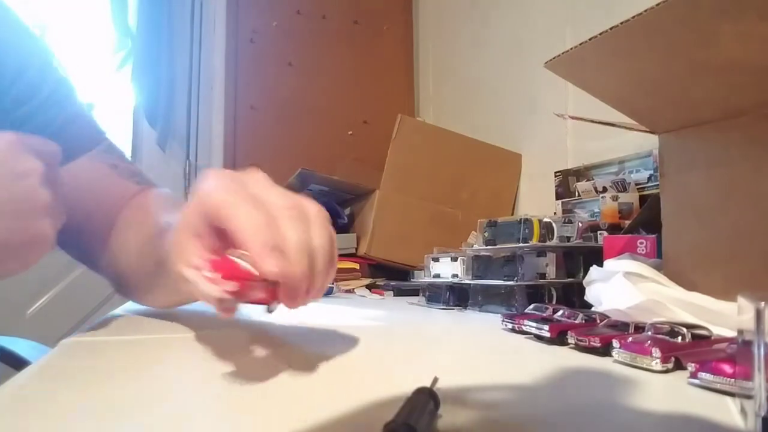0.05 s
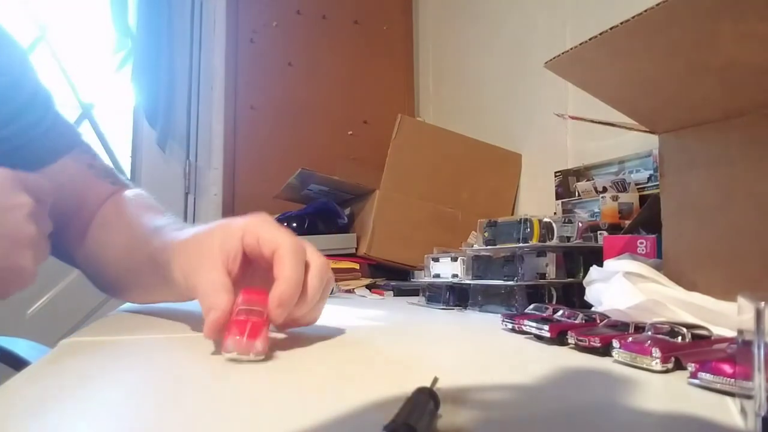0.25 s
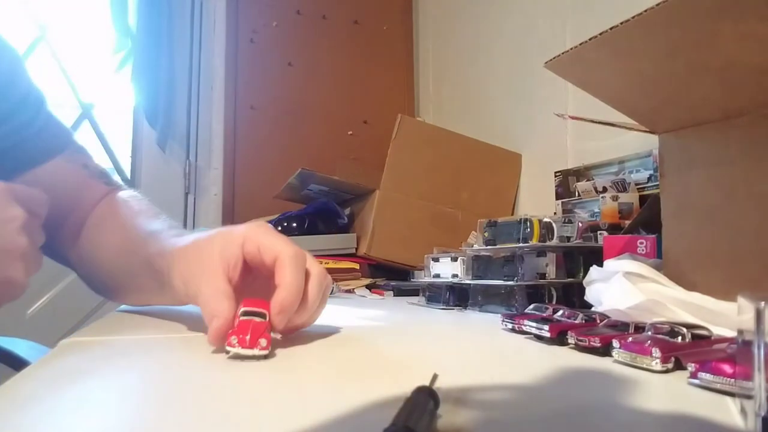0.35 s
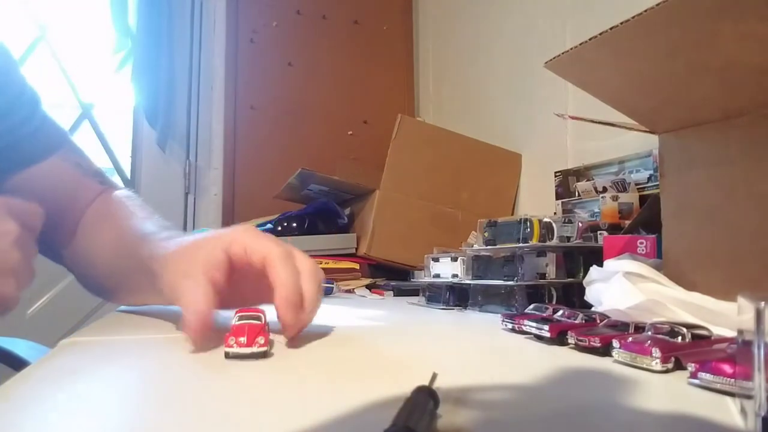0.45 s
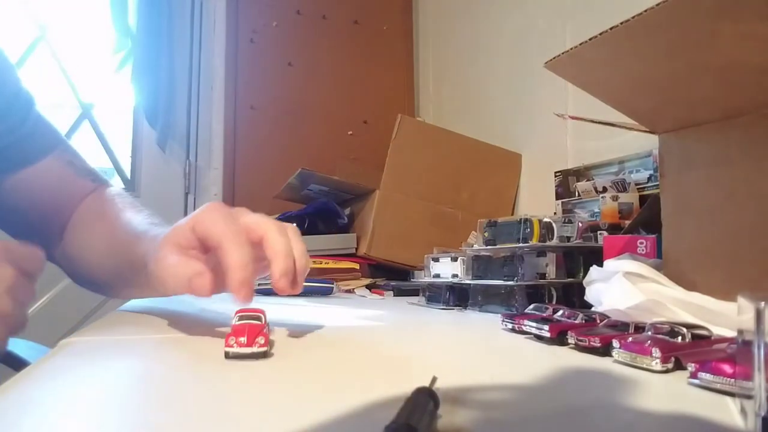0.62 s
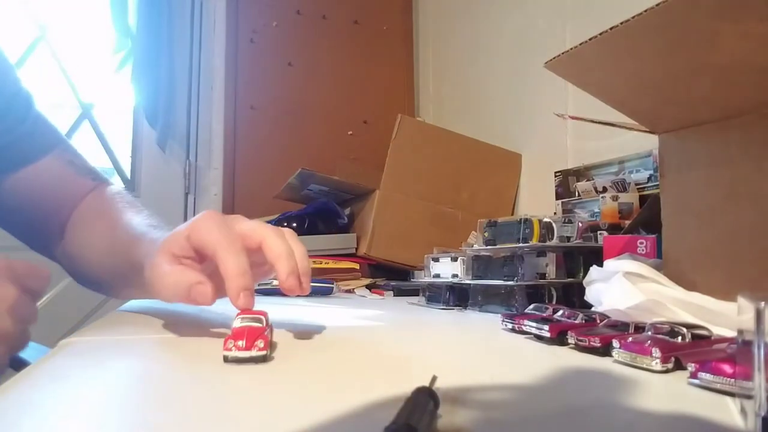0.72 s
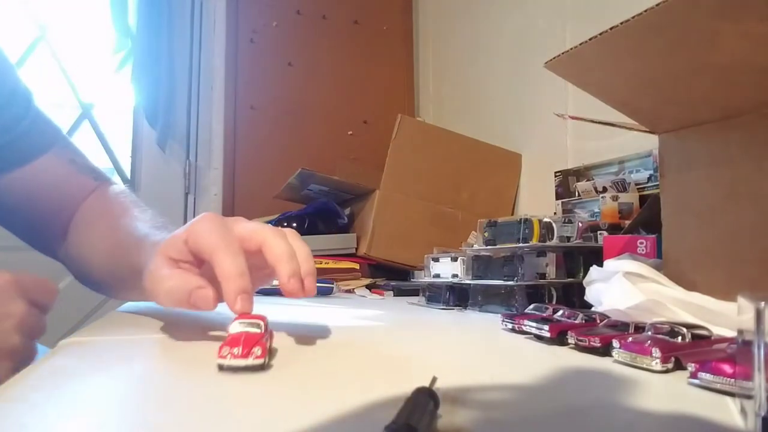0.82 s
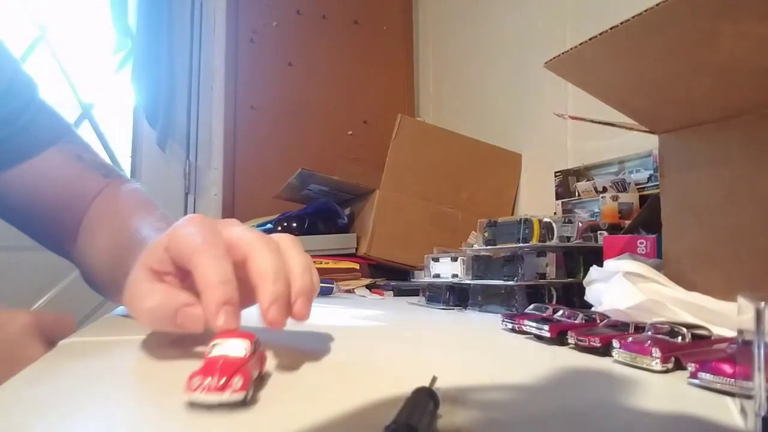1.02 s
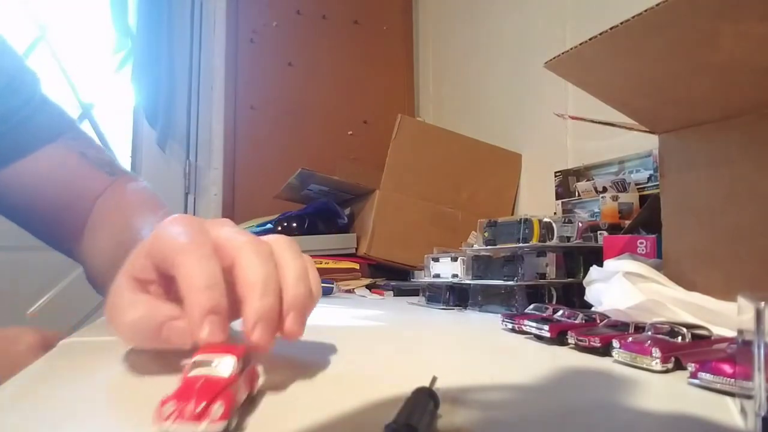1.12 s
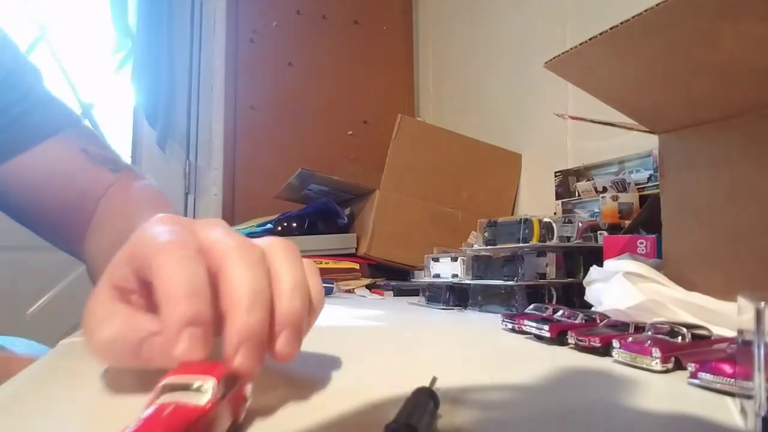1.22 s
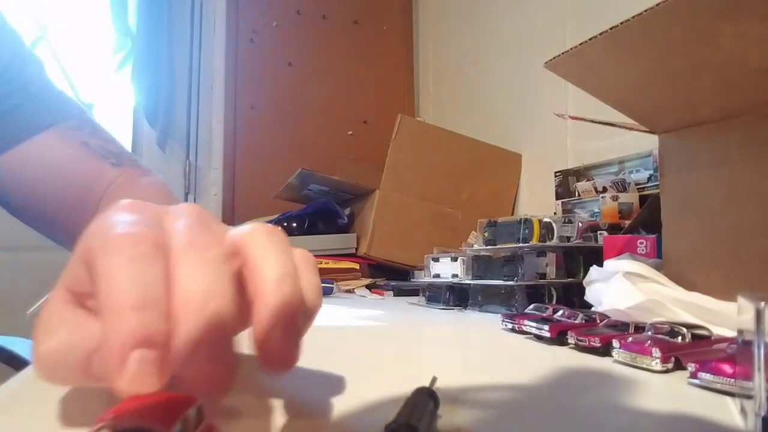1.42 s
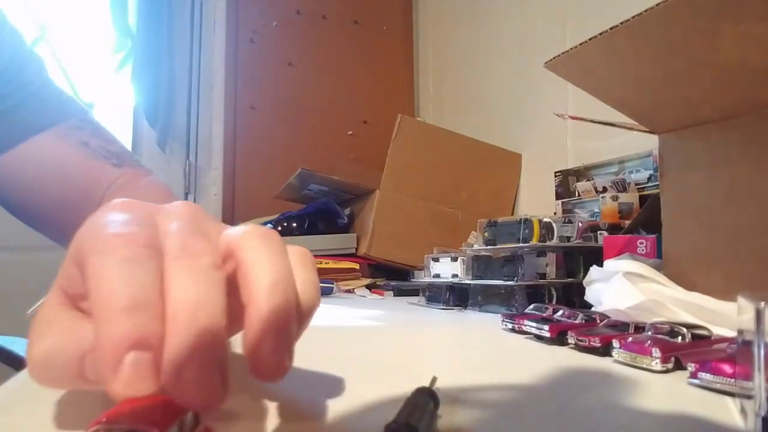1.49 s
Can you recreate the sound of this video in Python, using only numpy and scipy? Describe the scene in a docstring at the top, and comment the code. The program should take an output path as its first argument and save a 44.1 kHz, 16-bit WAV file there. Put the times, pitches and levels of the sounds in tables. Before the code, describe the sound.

Close stereo microphone in a small room: two bright metal-on-table knocks as a toy car is set down, a faint dull touch, then wheels drumming, whirring and rattling along the tabletop before fading.

```python
"""A small metal toy car is set down on a hollow table and bounces, close to a two-port microphone.
A finger touches its roof, then it is pushed along. Contact noise rings through the cast body, thumps
and random wheel bumps drive the modes of the table top, and loose axles tick against the shell.
A small room answers with scatter and a dying tail, over still air and microphone hiss."""
import sys
import numpy as np
from scipy import signal
from scipy.fft import rfft, irfft, next_fast_len
from scipy.io import wavfile

SR = 44100
rng = np.random.default_rng(int(sys.argv[2]) if len(sys.argv) > 2 else 0)


def generate_wav(sig):
    """Save sig (samples, or channels by samples) to the path in sys.argv[1] as 16-bit PCM at SR."""
    pcm = np.round(np.clip(np.atleast_2d(sig).T, -1, 1) * 32767).astype(np.int16)
    wavfile.write(sys.argv[1], SR, pcm)


def magnitude_from_level(level_db):
    """Linear magnitude for a level in decibels (20 dB per decade)."""
    exponent = np.asarray(level_db, float) / 20
    return 10 ** exponent


N = 68355  # samples, about 1.55 s

# Wheels landing. Each row: start in seconds, click level in dB, body knock level in dB,
# ring of the struck corner in Hz.
LANDING_ROWS = [(0.2072, -15.5, -14.5, 2150), (.214, -43, -31, 2150), (0.221, -32, -23, 2150),
                (0.2965, -31, -31, 1520), (0.3359, -17, -10, 760), (0.341, -14.5, -21.5, 1300),
                (0.352, -45, -19, 805), (.366, -27, -27.5, 2000), (0.3718, -16.5, -11, 2800),
                (0.378, -27.5, -21, 1200), (0.386, -31, -35, 2000), (0.3914, -39, -24, 3100),
                (.396, -35.5, -32.5, 2500), (0.4355, -37, -48, 2100)]
# The weight coming down on the table. Each row: start in seconds, thump level in dB.
THUMP_ROWS = [(0.2078, -22), (0.2139, -14), (0.223, -30), (.298, -36.5), (.337, -24), (0.3437, -13.5),
              (0.352, -37.5), (0.372, -40), (.379, -22), (.397, -32)]
# A finger pressing on the roof. Each row: start in seconds, thump level in dB.
TOUCH_ROWS = [(0.575, -27.5), (0.619, -62)]
# Single axle ticks, loud and faint, the one at 1.465 s as rolling starts again.
# Each row: start in seconds, tick level in dB, body knock level in dB.
TICK_ROWS = [(0.687, -44.5, -44), (0.7117, -46, -43), (0.7163, -35, -45.5), (0.731, -33, -40),
             (0.74, -32, -41), (0.7492, -30, -34), (0.763, -34, -43), (0.7696, -29.5, -38),
             (0.7769, -34, -41), (0.7832, -31, -63), (0.7955, -30, -59), (0.8324, -26, -35),
             (0.8362, -26, -34), (0.8484, -28.5, -30), (0.8614, -29, -53), (0.868, -28, -48),
             (0.8819, -28.5, -32), (0.8868, -32.5, -32), (0.9007, -25.5, -29.5), (0.9113, -40, -33),
             (0.9223, -35, -32), (0.9338, -30, -58), (0.9434, -37, -61), (0.955, -35, -38),
             (0.9661, -25, -38), (0.9726, -19, -29.5), (0.9787, -31, -26), (0.987, -31, -34.5),
             (0.9985, -37, -32.5), (1.012, -26, -55), (1.0183, -33, -54), (1.0335, -23.5, -27.5),
             (1.0444, -31, -31), (1.0652, -21.5, -50), (1.071, -23.5, -42), (1.0783, -20, -26.5),
             (1.093, -34, -37), (1.1041, -34, -26), (1.12, -27, -28.5), (1.1312, -26, -33),
             (1.144, -36.5, -50), (1.2198, -33, -29), (1.2314, -31.5, -63), (1.246, -36, -36.5),
             (1.2717, -33, -33.5), (1.3186, -47, -58), (1.331, -26.5, -31.5), (1.3882, -52, -42.5),
             (1.4654, -66, -57), (1.4924, -46.5, -48.5), (1.5315, -43, -41.5)]
# Rolling. Each row: time in seconds, then levels in dB of the deep drumming, the upper drumming,
# the tyre whirr and the fine rattle.
ROLL_LEVELS = [(0.6, -48, -47, -53, -102), (0.67, -51.5, -46, -70.5, -85), (0.718, -34, -44.5, -51.5, -76),
               (0.776, -32, -36, -47.5, -66), (0.834, -30.5, -37, -45.5, -54),
               (0.866, -28.5, -37.5, -40.5, -47), (0.908, -30, -34, -43, -46), (0.936, -29, -38, -42, -50),
               (0.978, -31.5, -27.5, -43, -47), (1.032, -29.5, -32, -40, -40.5),
               (1.07, -36.5, -31, -34, -39.5), (1.102, -30.5, -28.5, -40, -35.5),
               (1.116, -27.5, -32, -39.5, -38.5), (1.144, -31.5, -31.5, -37, -46),
               (1.162, -38, -32, -39.5, -37.5), (1.198, -31.5, -31, -46.5, -43),
               (1.236, -35.5, -34, -42, -51), (1.334, -48.5, -39, -51.5, -58),
               (1.404, -49.5, -53.5, -62, -64), (1.44, -66, -66, -72, -87), (1.488, -50.5, -43.5, -55, -72),
               (1.55, -37.5, -41, -51, -56)]
# The chassis shuddering on its wheels. Each row: time in seconds, shudder frequency in Hz.
SHUDDER_PITCH = [(0.6, 158), (0.654, 142), (0.682, 160), (0.766, 151.3), (0.838, 169.6), (0.914, 157.3),
                 (1.036, 173.4), (1.11, 159.7), (1.17, 151.6), (1.224, 139.7), (1.55, 137)]
# Cast body, low and high modes. Each row: frequency in Hz, width in Hz of the narrower of two
# resonances in series, relative level in dB.
SHELL_LOW = [(1088, 590, -27), (1370, 540, 7.5), (2000, 165, 16), (2500, 880, 10), (3170, 83, 5),
             (3350, 170, 4.5), (4380, 580, -1), (4900, 1500, -5)]
SHELL_HIGH = [(6190, 460, 1), (6575, 195, 6.5), (7660, 1270, 8.5), (8390, 370, 13), (8800, 544, 11),
              (10360, 290, 4), (10690, 510, -0.5), (14000, 3100, -12), (16000, 460, 1)]
# Wheels and axles, loaded by the hand. Columns as for the cast body.
AXLE_MODES = [(1200, 730, -7), (2016, 350, -1.5), (2614, 290, -1), (3049, 193, 3), (3510, 550, -9.5),
              (4393, 330, -2.5), (5320, 860, -12.5), (5980, 290, -4), (6690, 180, 0.5)]
# Table top, deep and upper modes. Each row: frequency in Hz, t60 in seconds, relative level in dB.
TOP_DEEP = [(108, 0.096, -3.5), (118.5, 0.21, -6), (158, 0.033, 0), (199.8, 0.046, 5)]
TOP_UPPER = [(221.5, 0.24, -17.5), (276.4, 0.05, 4.5), (348.5, 0.064, 1.5), (416.5, 0.039, 4),
             (512.5, 0.11, -4.5), (576, 0.029, 4.5), (714, 0.05, 2), (810, 0.035, -0.5), (929, 0.076, -4.5),
             (1024, 0.08, -8), (1123, 0.056, -6.5)]
# The table's drumming leans as the car moves. Each row: time in seconds, left minus right in dB
# ahead of the microphone ports.
DRUM_LEAN = [(.2, 0.5), (.45, 1.5), (.6, 4), (0.902, 3), (1.55, 1)]
# Room decay. Each row: frequency in Hz, t60 in seconds.
ROOM_T60 = [(100, 0.28), (500, 0.32), (2000, 0.3), (6000, 0.28), (10000, 0.15), (15000, .2)]
# Room strength. Each row: frequency in Hz, relative energy of the tail in dB.
ROOM_LEVEL = [(100, -16.5), (500, -3), (2000, -11.5), (6000, -6), (10000, -11.5), (15000, -5)]
# Balance of the microphone ports. Each row: frequency in Hz, left minus right in dB.
PORT_BALANCE = [(60, -7), (130, 11), (290, 4), (640, 1), (1410, -3), (3100, 3.5), (6820, 2), (15000, 7.5)]
# Still room spectrum. Each row: frequency in Hz, relative density in dB.
AIR_SPECTRUM = [(15, -36), (25, -6), (82, -2.5), (123, -2), (301, -10), (439, -13), (1130, -19.5),
                (3520, -18.5), (3820, -16), (5880, -27.5), (8140, -14), (9070, -22.5), (16000, -28.5)]
# Likeness of the air noise at the ports. Each row: frequency in Hz, left-right correlation.
AIR_LIKENESS = [(60, 0.33), (380, 0.24), (2380, -0.71), (15000, -0.08)]
# Balance of the air noise. Each row: frequency in Hz, left minus right in dB.
AIR_BALANCE = [(60, 0.5), (380, 1), (2380, -2.5), (15000, 1.5)]

CLICK_S, KNOCK_S, TICK_S = 0.0017, 0.0028, 0.0015  # decay constants of contact noise, seconds
THUMP_S, TOUCH_S, BUMP_S = 0.0012, 0.0045, 0.002  # force lengths in seconds, peak at a quarter
SETTLE_DB, SETTLE_S, SETTLES_PER_S = -22.5, 0.012, 1500  # jiggle: below the click, decay, rate
RING_DB, RING_WIDTH_HZ = -4, 450  # struck corner
BUMPS_PER_S, GRIT_PER_S, RATTLES_PER_S = 2000, 3000, 2000  # mean rates of random contacts
SHUDDER_WIDTH_HZ, SHUDDER_DB = 25, 5  # level against the deep table modes
SHUDDER_STEADY, RATTLE_LOCK = 0.77, 0.7  # 0 to 1: evenness of swing, hold of the shudder on the rattle
CONTACT_RISE_S, CONTACT_SAME = 0.00013, 0.2  # likeness of contact noise at the two ports
EARLY_DB, EARLY_S, EARLY_LOW_HZ = -14.5, 0.012, 580  # scatter off boxes and table top
LOW_CUT_HZ, TOP_HZ, AIR_DB = 88, 15250, -60


def blows():
    """Landings and finger touches: contact noise rings the shell, and forces thump the table."""
    s, click_db, knock_db, corner_hz = np.transpose(LANDING_ROWS)
    clicks = spikes(s, click_db)
    # loose axles jiggle on after each landing
    dying = signal.lfilter([magnitude_from_level(SETTLE_DB)], [1, -np.exp(-1 / SR / SETTLE_S)], clicks)
    jiggle = bursts(dying * chance(SETTLES_PER_S, 0.83), 0.00037)
    out = body(bursts(clicks, CLICK_S) + jiggle, SHELL_HIGH)
    knocks = bursts(spikes(s, knock_db), KNOCK_S)
    out = out + body(knocks + magnitude_from_level(8.5) * jiggle, SHELL_LOW)
    out = out + corner_rings(knocks, s, corner_hz)
    thumps = push(spikes(*np.transpose(THUMP_ROWS)), THUMP_S)
    touches = push(spikes(*np.transpose(TOUCH_ROWS)), TOUCH_S)
    return out + leaned(table(thumps + touches, TOP_DEEP + TOP_UPPER))


def corner_rings(knocks, s, corner_hz):
    """Each knock, up to the next landing, excites one resonance of the struck corner."""
    out = np.zeros((2, N))
    edges = np.append(np.round(s * SR), N)
    sample = np.arange(N)
    gain = magnitude_from_level(RING_DB) * np.sqrt(SR / RING_WIDTH_HZ / np.pi)
    for k, hz in enumerate(corner_hz):
        mine = (sample >= edges[k]) & (sample < edges[k + 1])
        out += gain * resonate(knocks * mine, hz, RING_WIDTH_HZ)
    return out


def rolling():
    """Wheel bumps shake chassis and table, grit whirrs in the axles, loose metal rattles and ticks."""
    s, *levels = np.transpose(ROLL_LEVELS)
    t = np.arange(N) / SR
    fade_in = np.clip((t - s[0]) / 0.027, 0, 1)
    deep, upper, whirr, rattle = [magnitude_from_level(np.interp(t, s, db)) * fade_in for db in levels]
    bumps = push(chance(BUMPS_PER_S, 3.1) * rng.standard_normal(N), BUMP_S)
    shudder = chassis_shudder(bumps)
    drumming = deep * evened(magnitude_from_level(SHUDDER_DB) * shudder + evened(table(bumps, TOP_DEEP)))
    out = leaned(drumming + upper * evened(table(bumps, TOP_UPPER)))
    grit = bursts(chance(GRIT_PER_S, 0.89), 0.0023)
    out = out + whirr * evened(body(grit, AXLE_MODES))
    # the fine rattle grows stronger at the crests of the shudder
    crest = np.maximum(1 + RATTLE_LOCK * shudder, 0)
    contacts = bursts(crest * chance(RATTLES_PER_S, 2.5), TICK_S)
    out = out + rattle * evened(body(contacts, SHELL_HIGH))
    return out + axle_ticks()


def chassis_shudder(bumps):
    """Bumps drive a resonance of gliding pitch; its swing is partly evened out in strength."""
    t = np.arange(N) / SR
    turn = np.exp(2j * np.pi * np.cumsum(np.interp(t, *np.transpose(SHUDDER_PITCH))) / SR)
    r = np.exp(-np.pi * SHUDDER_WIDTH_HZ / SR)
    # shifted to zero frequency, the resonance is a two-pole low-pass
    swing = signal.lfilter([1], np.convolve([1, -r], [1, -r]), bumps / turn)
    steady = swing / (abs(swing) + 1e-9) ** SHUDDER_STEADY
    return evened((turn * steady).real)


def axle_ticks():
    """Single axle contacts sound through the high shell modes and the loaded axles."""
    s, tick_db, knock_db = np.transpose(TICK_ROWS)
    ticks = body(bursts(spikes(s, tick_db), TICK_S), SHELL_HIGH)
    return ticks + body(bursts(spikes(s, knock_db), TICK_S), AXLE_MODES)


def body(x, modes):
    """Metal modes colour contact noise through a unit-energy response, signs alternating."""
    impulse = np.eye(1, 1024)[0]
    tap = np.zeros(1024)
    for k, (hz, width_hz, db) in enumerate(modes):
        mode = resonate(resonate(impulse, hz, width_hz), hz, 3 * width_hz)
        tap += (-1) ** k * magnitude_from_level(db) * mode
    return signal.oaconvolve(x, tap[None] / np.linalg.norm(tap), axes=1)[:, :N]


def table(force, modes):
    """The table top answers a force with dying sines, one to a mode."""
    t = np.arange(SR // 2) / SR
    tap = np.zeros(len(t))
    for k, (hz, t60, db) in enumerate(modes):
        tap += (-1) ** k * magnitude_from_level(db - 60 * t / t60) * np.sin(2 * np.pi * hz * t)
    return signal.oaconvolve(force, tap)[:N]


def bursts(train, decay_s):
    """Every impulse opens a fast-dying burst of contact noise, partly alike at both ports."""
    t = np.arange(1000) / SR
    shape = (1 - np.exp(-t / CONTACT_RISE_S)) * np.exp(-t / decay_s)
    a, b = rng.standard_normal((2, N))
    noise = np.array([a, CONTACT_SAME * a + np.sqrt(1 - CONTACT_SAME ** 2) * b])
    return signal.oaconvolve(train, shape / shape.max())[:N] * noise


def push(train, length_s):
    """Every impulse becomes a force that swells and eases off, its sum kept."""
    u = np.arange(1500) / SR / length_s * 4
    shape = u * np.exp(-u)
    return signal.oaconvolve(train, shape / np.sum(shape))[:N]


def spikes(times, dbs):
    """A train of single-sample impulses at given times and levels."""
    out = np.zeros(N)
    at = np.minimum(np.round(np.asarray(times) * SR).astype(int), N - 1)
    np.add.at(out, at, magnitude_from_level(dbs))
    return out


def chance(per_s, spread_db):
    """Impulses at random moments, a few of them large."""
    return (rng.random(N) < per_s / SR) * magnitude_from_level(spread_db * np.minimum(rng.exponential(1, N), 3))


def resonate(x, hz, width_hz):
    """One damped resonance, about gain 1 at its centre."""
    pole = np.exp((2j * np.pi * hz - np.pi * width_hz) / SR)
    return 2 * signal.lfilter([1 - abs(pole)], [1, -pole], x).real


def evened(x):
    """Scales to rms 1."""
    return x / np.sqrt(np.mean(x ** 2) + 1e-20)


def read(points, hz):
    """Reads a table along log frequency."""
    f, value = np.transpose(points)
    return np.interp(np.log(hz + 1), np.log(f + 1), value)


def leaned(x):
    """Places the drumming between the ports by a level difference that moves in time."""
    half = magnitude_from_level(np.interp(np.arange(N) / SR, *np.transpose(DRUM_LEAN)) / 2)
    return x * np.array([half, 1 / half]) * 2 / (half + 1 / half)


def room(x):
    """Close scatter and sparse taps dying band by band; each side blends three tap sets over time."""
    taps = np.zeros((6, SR // 2))
    at = np.arange(130, SR // 2 - 20, 20)
    at = at + rng.integers(0, 20, (6, len(at)))
    np.put_along_axis(taps, at, rng.choice([-1., 1.], at.shape), 1)

    hz, t, z = signal.stft(taps, SR, nperseg=256)
    fade = magnitude_from_level(-60 * t / np.maximum(read(ROOM_T60, hz), 0.02)[:, None])
    fade = fade / np.linalg.norm(fade, axis=1, keepdims=True)
    fade = fade * magnitude_from_level(read(ROOM_LEVEL, hz))[:, None]
    # one tap in 20 samples, frames 128 samples apart
    tail = signal.istft(z * fade, SR, nperseg=256)[1] * np.sqrt(20 / 128)

    high_pass = signal.butter(2, EARLY_LOW_HZ, "high", fs=SR)
    near = signal.lfilter(*high_pass, taps[:, 110:1110]) * np.exp(-np.arange(1000) / SR / EARLY_S)
    tail[:, :1000] += magnitude_from_level(EARLY_DB) * near / np.linalg.norm(near[0])

    # three weights of constant total power
    phase = np.arange(N) / SR * 4 + np.arange(3)[:, None] / 3
    weight = np.cos(np.pi * phase) * np.sqrt(2 / 3)
    return signal.fftconvolve(weight * x[:, None], tail.reshape(2, 3, -1), axes=2)[..., :N].sum(1)


def ports(x):
    """Two microphone ports differ in level by frequency."""
    size = next_fast_len(N + 4096)
    half = magnitude_from_level(read(PORT_BALANCE, np.fft.rfftfreq(size, 1 / SR)) / 2)
    return irfft(rfft(x, size) * np.array([half, 1 / half]), size)[:, :N]


def air():
    """The still room and the microphone's own hiss: shaped noise, partly alike at the ports."""
    hz = np.fft.rfftfreq(N, 1 / SR)
    a, b = rfft(rng.standard_normal((2, N)))
    same = np.clip(read(AIR_LIKENESS, hz), -1, 1)
    half = magnitude_from_level(read(AIR_BALANCE, hz) / 2)
    right = same * a + np.sqrt(1 - same ** 2) * b
    z = np.array([a * half, right / half]) * magnitude_from_level(read(AIR_SPECTRUM, hz))
    return magnitude_from_level(AIR_DB) * evened(irfft(z, N))


def scene():
    """Car and table without their lowest bass, their room tail, the ports and the still air."""
    low_cut = signal.butter(4, LOW_CUT_HZ, "high", fs=SR, output="sos")
    car = signal.sosfilt(low_cut, blows() + rolling())
    return ports(car + room(car)) + air()


def roll_off(x):
    """The treble ends steeply here."""
    return signal.sosfilt(signal.butter(12, 16510, fs=SR, output="sos"), x)


def record(dry):
    """The microphone's treble edge, a steep low-pass, closes the mix."""
    edge = signal.cheby1(10, 1, TOP_HZ, fs=SR, output="sos")
    mix = signal.sosfilt(edge, dry)
    return roll_off(mix)


dry = scene()
out = record(dry)
generate_wav(out)
```